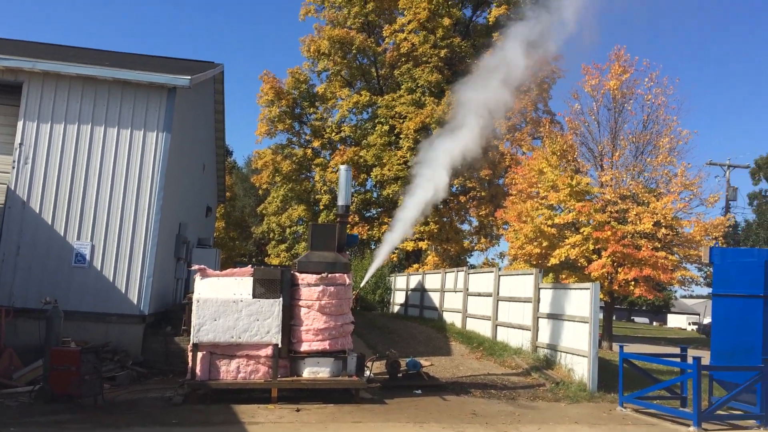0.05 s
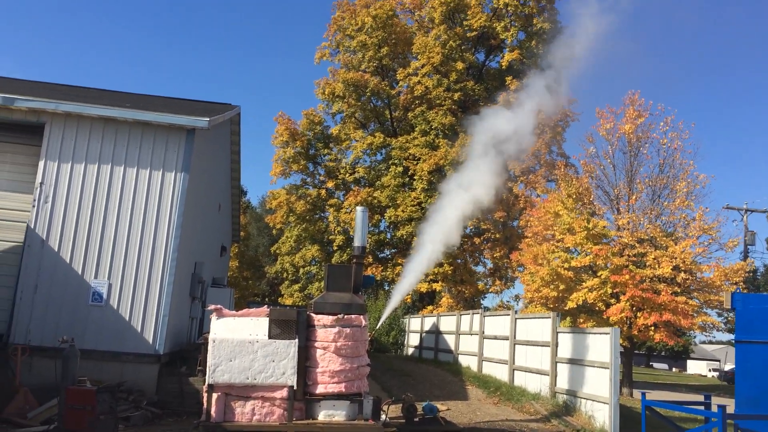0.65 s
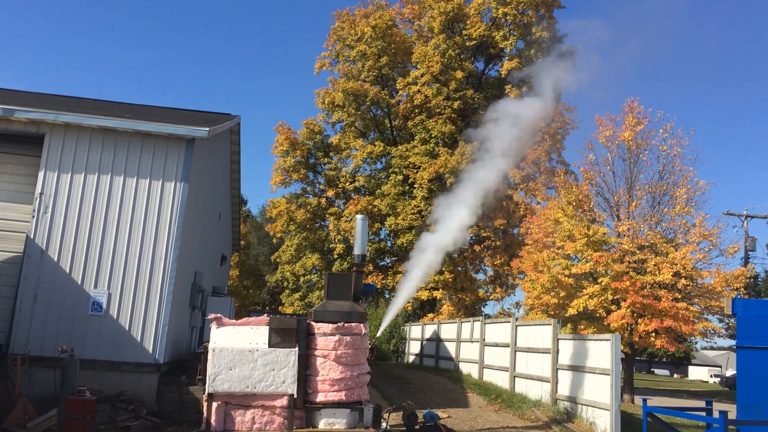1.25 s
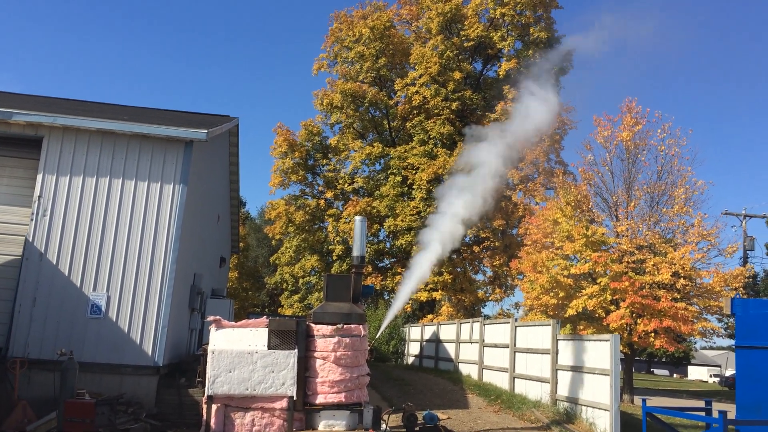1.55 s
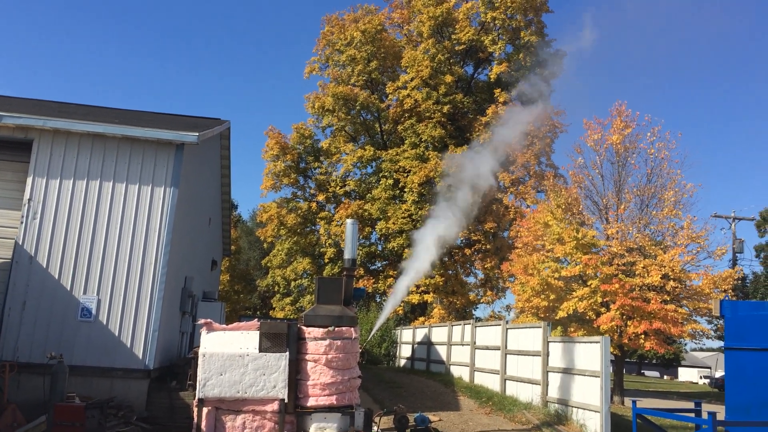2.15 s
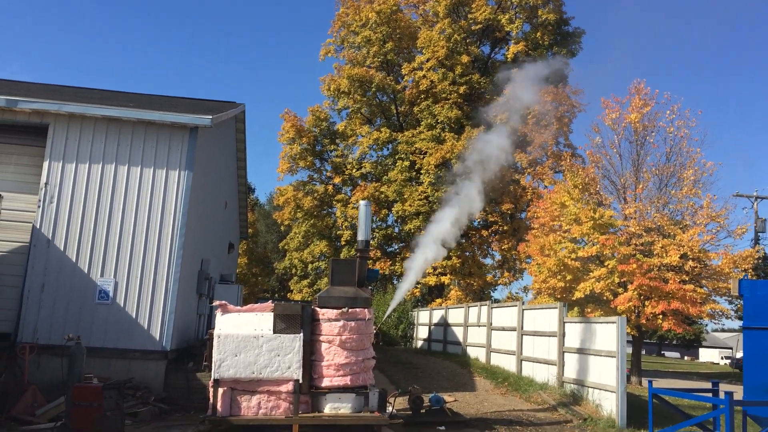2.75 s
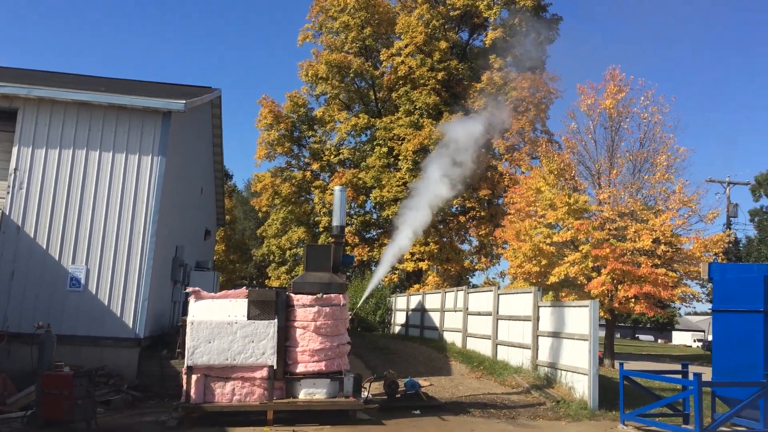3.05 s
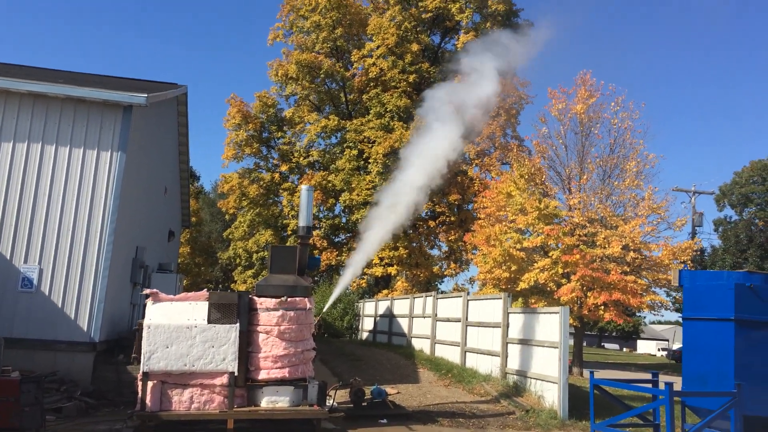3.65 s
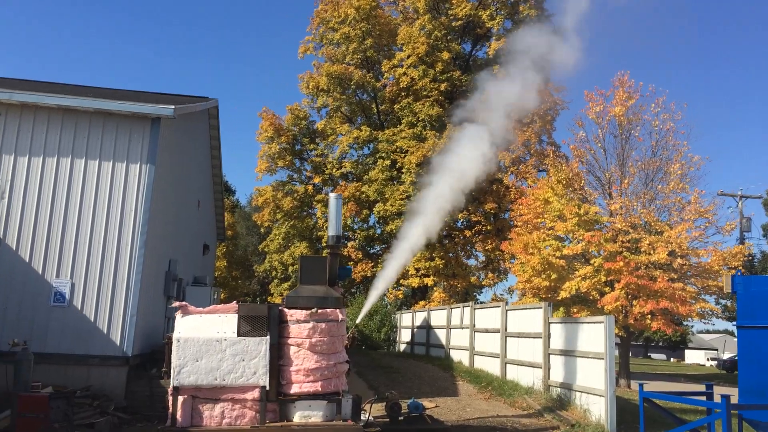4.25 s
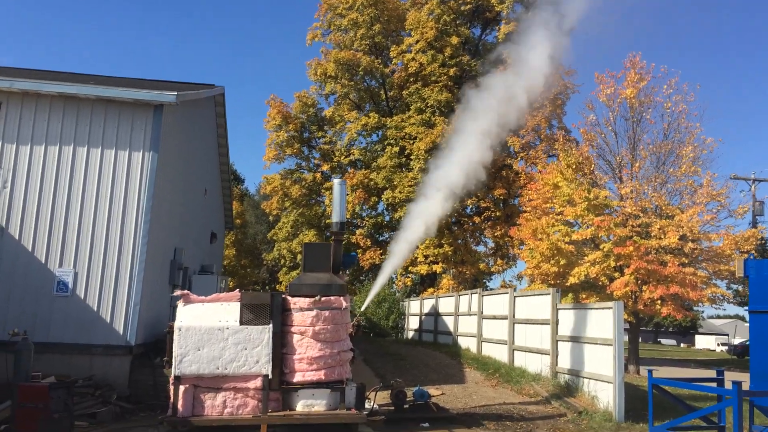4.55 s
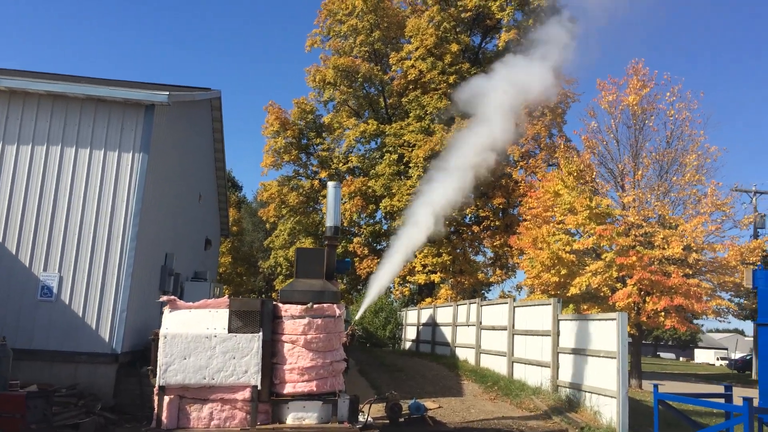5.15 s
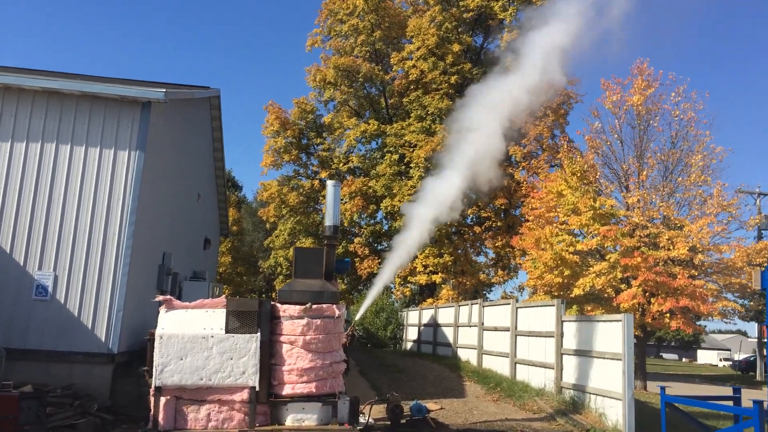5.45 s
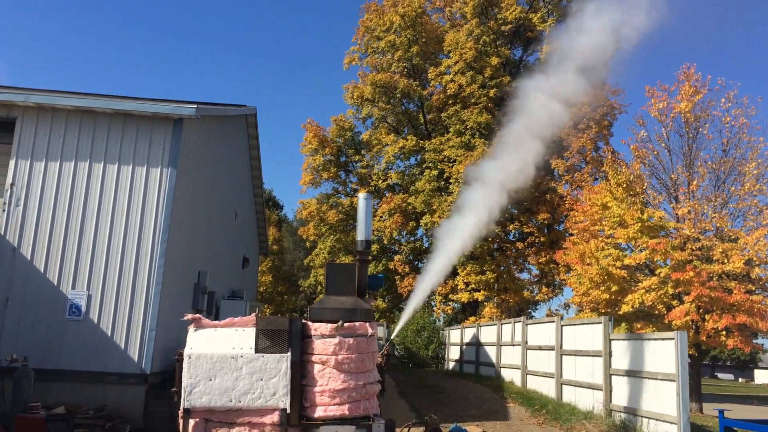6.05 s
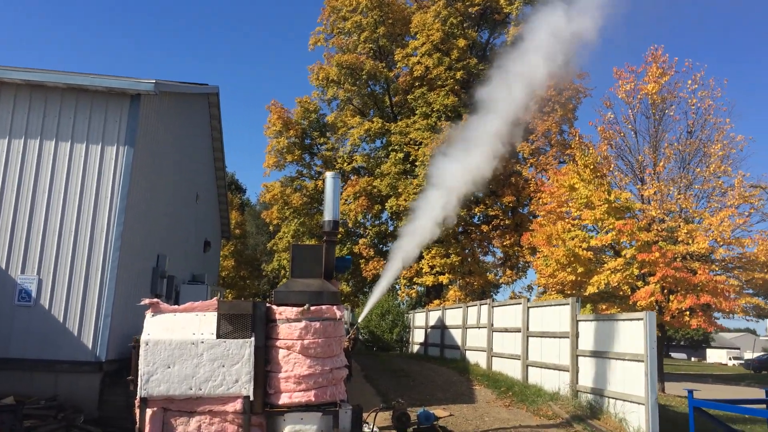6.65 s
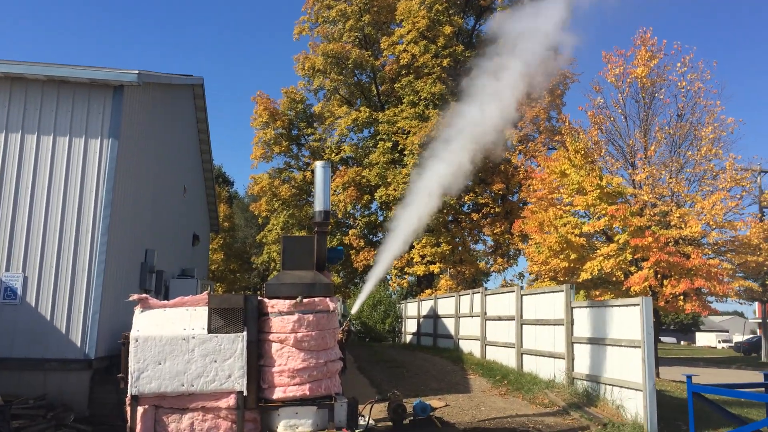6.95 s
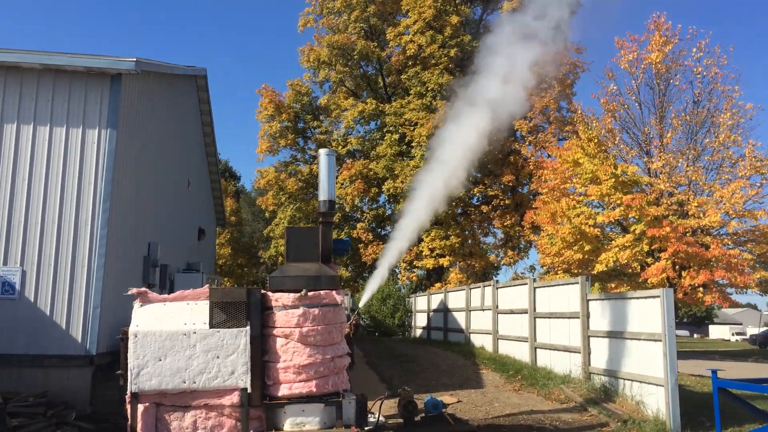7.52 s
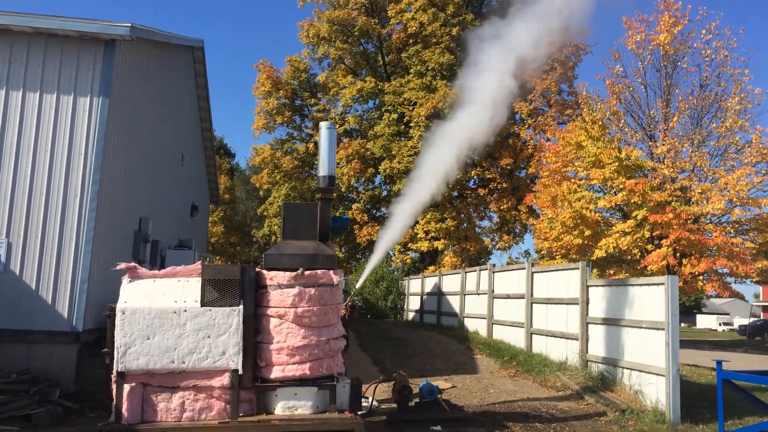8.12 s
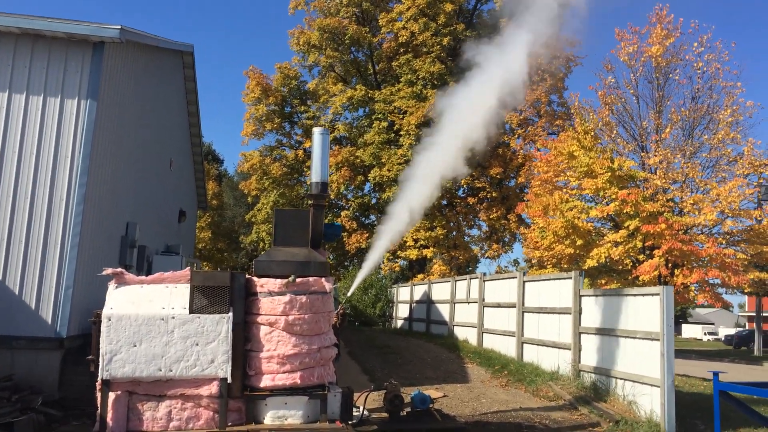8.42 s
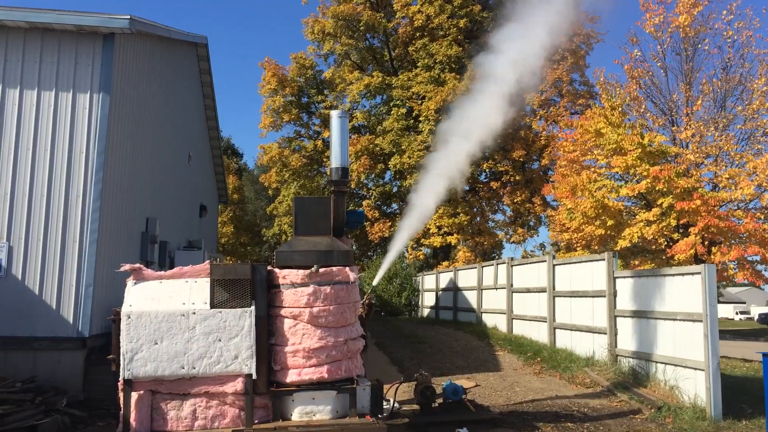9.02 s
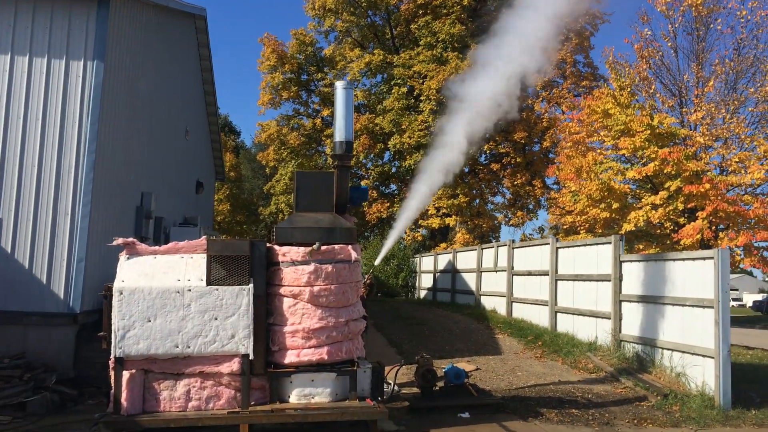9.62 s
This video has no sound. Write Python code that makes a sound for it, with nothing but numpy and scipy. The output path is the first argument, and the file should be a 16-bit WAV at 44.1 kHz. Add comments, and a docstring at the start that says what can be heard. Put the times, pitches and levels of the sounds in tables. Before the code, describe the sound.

Wet steam vents from the pipe of a small boiler in an open yard, making a loud, bright hiss with a fine sizzle on top. The hiss weakens, stays softer for about a second, then swells back to full strength and carries on with short, wet sputters. A faint boiler rumble lies underneath. The tone shifts slightly as the microphone moves closer.

```python
"""A jet of wet steam vents from the pipe of a small boiler in a yard. Its turbulence radiates broadband noise:
small eddies hiss at the nozzle, large ones roar in the plume, and torn droplets sizzle. Slugs of water make
it sputter; the jet eases for a while, then returns to full strength. As the listener walks closer and clear
of the screening boiler, interference with the ground echo sweeps slowly through the hiss. Walls and trees
scatter the sound, and the boiler rumbles and hums underneath."""
import sys
import numpy as np
from scipy import signal
from scipy.fft import rfft, irfft, next_fast_len
from scipy.io import wavfile
from scipy.ndimage import map_coordinates

SR = 44100
rng = np.random.default_rng(int(sys.argv[2]) if len(sys.argv) > 2 else 0)


def digitize_waveform(pressure):
    """Quantize a signal to 16-bit integers and store it at the path in sys.argv[1].

    Rows of a 2-D input are taken as channels; values are limited to [-1, 1].
    """
    field = np.atleast_2d(pressure).T
    bounded = np.clip(field, -1, 1)
    quanta = np.round(bounded * 32767).astype(np.int16)
    wavfile.write(sys.argv[1], SR, quanta)


N = 431298

# Strength of the jet: t/s, relative level/dB
JET_LEVEL = [(0.0, -17.5), (0.45, -21), (0.68, -19.5), (0.92, -22.5), (1.45, -20.5), (2.0, -27.5),
             (2.6, -26.5), (3.1, -28.0), (3.3, -21), (3.48, -17.0), (3.85, -18.0), (6.55, -18.5),
             (7.1, -17), (7.9, -17.5), (8.15, -17), (8.95, -18.5), (9.3, -17), (9.78, -17.5)]
# Brief puffs and sags of pressure: t/s, level change/dB
PRESSURE_PUFFS = [(0.12, 0.5), (2.15, 3), (2.4, 1.5), (2.86, 3.5), (7.76, -1), (9.51, -2.5)]
# Surges of the plume as water passes: t/s, rise of the roar/dB, half length/s
WATER_SURGES = [(0.21, 2.5, 0.04), (0.595, 7.5, 0.068), (1.375, 7.5, 0.03), (3.4, 2, 0.13),
                (3.726, 3, 0.032), (4.403, 4, 0.044), (4.643, 7.5, 0.029), (4.992, 9.9, 0.038),
                (5.286, 12, 0.048), (5.66, 5.2, 0.048), (5.897, 5.5, 0.037), (6.26, 1.5, 0.036),
                (6.493, 11, 0.047), (7.09, 2.5, 0.05), (7.596, 4.5, 0.048), (8.2, 8, 0.045),
                (8.453, 11.5, 0.05), (8.833, 5, 0.059), (9.08, 5.5, 0.056), (9.398, 12, 0.037)]
# Flares of fine spray between surges: t/s, rise of the sizzle/dB
SPRAY_FLARES = [(3.52, 2.5), (3.8, 1), (4.14, 1.5), (4.87, 2), (5.181, 4), (5.49, 3.5), (6.12, 4),
                (6.67, 3.5), (7.3, 3.3), (8.058, 4), (8.36, 4.5), (8.679, 3.5), (8.95, 3.5), (9.25, 3.5),
                (9.56, 2.5)]
# Prominence of the spray near the nozzle: t/s, gain/dB
SPRAY_PROXIMITY = [(7.5, 0), (8.2, 0.5), (9.78, 1.5)]
# Spectral densities of the three jet noises: f/Hz, relative level/dB
HISS_SPECTRUM = [(200, -33), (700, -17), (1400, -8), (2200, -3.5), (3200, -1), (4400, 1.5), (6500, 2),
                 (7900, -1.5), (10000, -5), (15000, -21.5)]
ROAR_SPECTRUM = [(30, -24), (130, -11), (300, -5.5), (520, -0.5), (900, -0.5), (1400, 1.5), (2200, 0),
                 (3000, -3), (4200, -1.5), (8000, -38), (16000, -43)]
SIZZLE_SPECTRUM = [(3000, -43), (7000, -1), (9600, -0.5), (11500, -0.5), (13000, -1.5), (15300, -5.5)]
# Single slugs spat out: t/s, relative level/dB, centre f/Hz, half length/s, half width/octaves
WATER_SLUGS = [(1.4, -34, 900, .02, 1.3), (3.848, -25.5, 2240, 0.013, 0.44),
               (4.635, -25.5, 1990, 0.028, 0.23), (6.464, -30, 165, 0.007, 0.38),
               (6.469, -20, 1200, .007, 1.9), (7.645, -21, 2350, 0.011, 0.29),
               (7.659, -21.5, 800, 0.0034, 0.87)]
# Screening of the jet by the boiler: t/s, share screened (0-1)
SCREENED_SHARE = [(0, 1), (3.7, 0.98), (4.45, 0.8), (4.8, 0.13), (9.78, 0)]
# Hollow colour of sound diffracted round the boiler: f/Hz, gain/dB
DIFFRACTION_GAIN = [(200, 3), (310, 2.5), (420, -3), (520, 1.5), (700, 0.5), (1080, 1.4), (1500, 2),
                    (2100, 2), (2650, 0), (3250, -7.5), (3900, -2.5), (4600, -1.5), (5200, -0.5), (5900, 0),
                    (7000, -1.5)]
# Reflection from the dirt yard: f/Hz, gain/dB
GROUND_GAIN = [(100, -6), (330, -12), (700, -14.5), (2200, -10), (4200, -12.5), (6500, -8.5),
               (15000, -13.5)]
# Lag of the ground echo behind the direct sound: t/s, lag/ms
GROUND_LAG = [(0, 1.32), (2.4, 1.4), (3.5, 1.36), (4.1, 1.41), (5.2, 1.49), (7.1, 1.594), (7.8, 1.73),
              (9.78, 1.74)]
# Echoes from the ribbed shed wall, the fence and the trees: delay/s, spread/s, relative level/dB
ECHO_CLUSTERS = [(0.013, .0025, -9.5), (.03, 0.0037, -15.5), (.055, 0.022, -16.5)]
# Course of the boiler noise: t/s, relative rumble level/dB, relative hum level/dB
BOILER_LEVELS = [(0.0, -53, -53), (1.8, -48.5, -56), (3.2, -50, -50.5), (3.8, -53, -61), (7.6, -51, -62),
                 (9.2, -52.5, -47.5), (9.78, -52, -58)]
# Spectral density of the fire's rumble: f/Hz, relative level/dB
RUMBLE_SPECTRUM = [(15, -39), (35, -35), (62, -1), (110, -2.5), (180, 3), (260, -7), (500, -9.5),
                   (1500, -32)]

FULL_DB = -18  # JET_LEVEL at full strength
HISS_DB, ROAR_DB, SIZZLE_DB = -18, -33.5, -23.5  # base levels at the source
ROAR_FOLLOWS, SIZZLE_FOLLOWS = 0.095, 0.97  # dB per dB of jet strength
PUFF_S, FLARE_S = 0.034, 0.043  # half lengths
FLARE_THINS, FLARE_DULLS = 0.62, 0.42  # dB of lower and of upper hiss lost per dB of flare
LIFT_DB, LIFT_KNEE_DB = 3.0, 3  # most that a surge lifts the lower hiss; surge where this levels off
WET_DULL_DB = 1.5  # upper hiss lost at the wettest
SPRAY_CHOKE = 0.47  # dB of sizzle lost per dB of surge
SPLIT_HZ, HUM_HZ, TOP_HZ = 4270, 135.5, 15300


def steam_jet():
    """Turbulent mixing radiates noise; surges of water darken it and flares of spray brighten it."""
    strength_db = curves(JET_LEVEL)[0] - FULL_DB + swells(*np.transpose(PRESSURE_PUFFS), PUFF_S)
    surge_db = swells(*np.transpose(WATER_SURGES))
    flare_db = swells(*np.transpose(SPRAY_FLARES), FLARE_S)
    wetness = np.clip(surge_db / 8, 0, 1)
    sputter_db = (1.2 + 2.0 * wetness) * wobble(70) - 0.97 * wetness  # a wetter jet breaks up more
    moisture = np.tanh(wobble(11))  # small changes of wetness trade spray against roar
    flutter = np.tanh(wobble(32))  # swirling air in the path modulates the treble most
    roar = plume_roar(strength_db, surge_db + sputter_db, moisture, flutter)
    hiss = nozzle_hiss(strength_db, surge_db, flare_db, wetness, moisture, flutter)
    sizzle = spray_sizzle(strength_db, surge_db, flare_db, moisture, flutter)
    return roar + hiss + sizzle


def nozzle_hiss(strength_db, surge_db, flare_db, wetness, moisture, flutter):
    """Small eddies radiate high frequencies; water shifts the balance of the lower and upper bands."""
    noise = turbulence(HISS_SPECTRUM)
    lower = filtered(noise, lambda hz: 1 / (1 + (hz / SPLIT_HZ) ** 4))
    lower_db = LIFT_DB * np.tanh(surge_db / LIFT_KNEE_DB) - FLARE_THINS * flare_db + 0.51 * moisture
    upper_db = -WET_DULL_DB * wetness ** 2 - FLARE_DULLS * flare_db
    hiss = amp(lower_db) * lower + amp(upper_db) * (noise - lower)
    return amp(HISS_DB + strength_db + 0.76 * flutter + 0.58 * wobble(90)) * hiss


def plume_roar(strength_db, water_db, moisture, flutter):
    """Large eddies radiate lower frequencies, amplitude-modulated by the passing water."""
    level_db = ROAR_DB + ROAR_FOLLOWS * strength_db + water_db + 0.83 * moisture + 0.4 * flutter
    return amp(level_db) * turbulence(ROAR_SPECTRUM)


def spray_sizzle(strength_db, surge_db, flare_db, moisture, flutter):
    """Atomisation: torn droplets burst in tiny clumps, giving a grainy treble noise."""
    spray = unit(turbulence(SIZZLE_SPECTRUM) * amp(0.84 * wobble(1500)))
    level_db = SIZZLE_DB + SIZZLE_FOLLOWS * strength_db - SPRAY_CHOKE * surge_db + flare_db - moisture
    flicker_db = 0.75 * flutter + 0.59 * wobble(75)
    return amp(level_db + curves(SPRAY_PROXIMITY)[0] + flicker_db) * spray


def slug_bursts():
    """Each bursting slug is a noise transient, Gaussian in time and in log frequency."""
    t = np.arange(N) / SR
    out = np.zeros(N)
    for centre_s, db, hz, half_s, octaves in WATER_SLUGS:
        span = abs(t - centre_s) < 4 * half_s + 0.02
        noise = rng.standard_normal(N)[span]
        detuning = np.log2((np.fft.rfftfreq(len(noise), 1 / SR) + 1) / hz) / octaves
        band = irfft(rfft(noise) * np.exp(-detuning ** 2 / 2), len(noise))
        envelope = np.exp(-((t[span] - centre_s) / half_s) ** 2 / 2)
        out[span] += amp(db) * unit(band * envelope) * np.sqrt(np.mean(envelope ** 2))
    return out


def diffraction(x):
    """Sound diffracts round the boiler and is hollow until the listener steps clear."""
    screened = np.clip(curves(SCREENED_SHARE)[0], 0, 1)
    return (1 - screened) * x + screened * coloured(x, DIFFRACTION_GAIN)


def ground_interference(x):
    """Direct and reflected waves form a comb filter, which slides down as their path difference grows."""
    lag_ms, = curves(GROUND_LAG)
    echo = map_coordinates(coloured(x, GROUND_GAIN), [np.arange(N) - lag_ms * SR / 1000], order=5)
    return amp(-0.91) * (x + echo)


def scattering(x):
    """Diffuse reflection from walls and trees gives duller echoes that change as the listener moves."""
    t = np.arange(SR // 8) / SR
    clusters = sum(amp(db) * unit(np.exp(-((t - delay) / spread) ** 2 / 2))
                   for delay, spread, db in ECHO_CLUSTERS)
    hop = SR // 2
    padded = np.pad(x, (hop, 2 * hop))
    fade = np.sin(np.pi * np.arange(2 * hop) / (2 * hop))
    out = np.zeros(len(padded) + len(t))
    for start in range(0, N + hop, hop):
        impulse_response = clusters * rng.standard_normal(len(t)) / np.sqrt(len(t))
        echo = signal.fftconvolve(padded[start:start + 2 * hop] * fade, impulse_response)
        out[start:start + len(echo)] += echo
    return coloured(out[hop:hop + N], [(2000, -0.5), (5000, -2), (15000, -3.5)])


def boiler():
    """Combustion noise: the fire rumbles, with a faint hum that wanders in pitch and level."""
    rumble_db, hum_db = curves(BOILER_LEVELS)
    rumble = amp(rumble_db + 3.0 + 1.2 * wobble(12)) * turbulence(RUMBLE_SPECTRUM)
    cycles = np.cumsum(HUM_HZ + 1.52 * wobble(8.6)) / SR
    hum = amp(hum_db + 2.0 + 1.5 * wobble(4)) * np.sin(2 * np.pi * cycles)
    return rumble + hum


def amp(db):
    """Decibels to amplitude ratio."""
    return 10 ** (np.asarray(db) / 20)


def unit(x):
    """Normalisation to rms 1."""
    return x / np.sqrt(np.mean(x ** 2) + 1e-20)


def curves(rows):
    """Linear interpolation of each column after the time, one value per sample."""
    times, *columns = np.transpose(rows)
    return [np.interp(np.arange(N) / SR, times, column) for column in columns]


def swells(times, heights, half_lengths):
    """Superposed rises, flatter on top and steeper at the sides than a Gaussian."""
    t = np.arange(N) / SR
    out = np.zeros(N)
    for centre_s, height, half_s in np.broadcast(times, heights, half_lengths):
        near = abs(t - centre_s) < 4 * half_s
        out[near] += height * np.exp(-abs((t[near] - centre_s) / half_s) ** 3.4 / 3.4)
    return out


def wobble(rate):
    """Smooth random modulation with rate knots a second."""
    return map_coordinates(rng.standard_normal(int(N * rate / SR) + 4), [np.arange(N) * rate / SR])


def filtered(x, response):
    """Linear filtering: the spectrum of x times a frequency response."""
    size = next_fast_len(N + 8192)
    return irfft(rfft(x, size) * response(np.fft.rfftfreq(size, 1 / SR)), size)[..., :N]


def coloured(x, spectrum):
    """Filtering by (f/Hz, gain/dB) points joined on a log frequency axis."""
    f, db = np.transpose(spectrum)
    return filtered(x, lambda hz: amp(np.interp(np.log(hz + 1), np.log(f), db)))


def turbulence(spectrum):
    """Random pressure fluctuations of the given spectrum, rms 1."""
    return unit(coloured(rng.standard_normal(N), spectrum))


def scene():
    """Superposition of the jet, its echoes and the boiler at one point, alike in both channels."""
    direct = diffraction(steam_jet() + slug_bursts())
    mono = ground_interference(direct + scattering(direct)) + boiler()
    return np.array([mono, mono])


def record(dry):
    """Band limiting: an ideal low-pass filter removes everything above TOP_HZ."""
    return filtered(dry, lambda hz: hz < TOP_HZ)


dry = scene()
out = record(dry)
digitize_waveform(out)
```